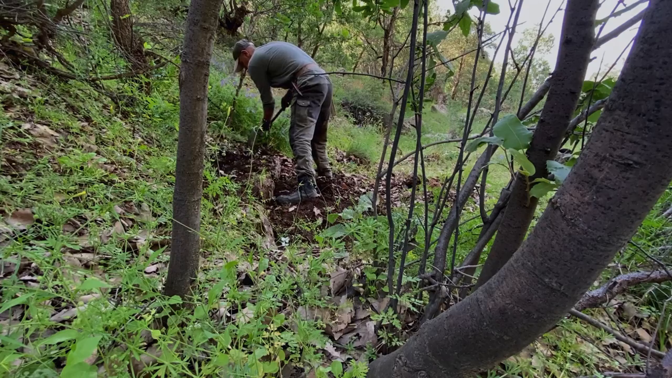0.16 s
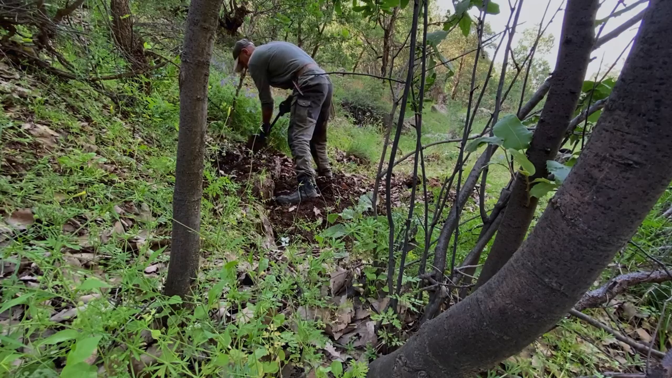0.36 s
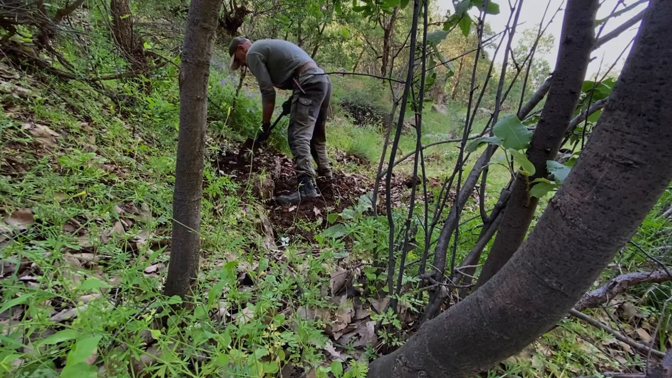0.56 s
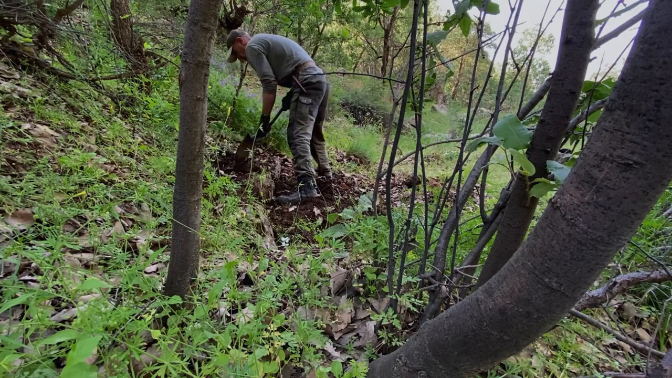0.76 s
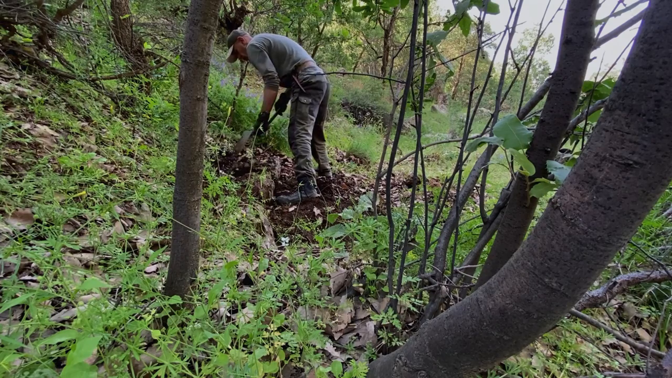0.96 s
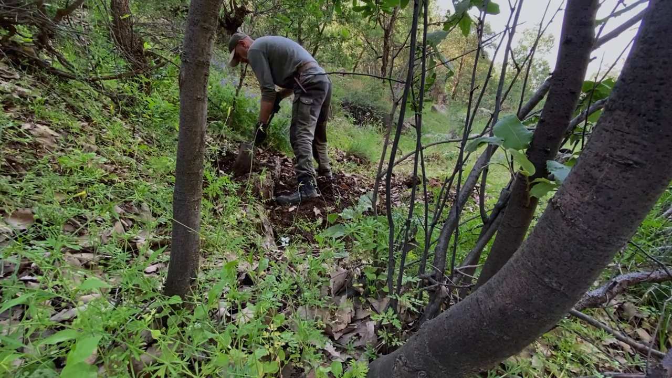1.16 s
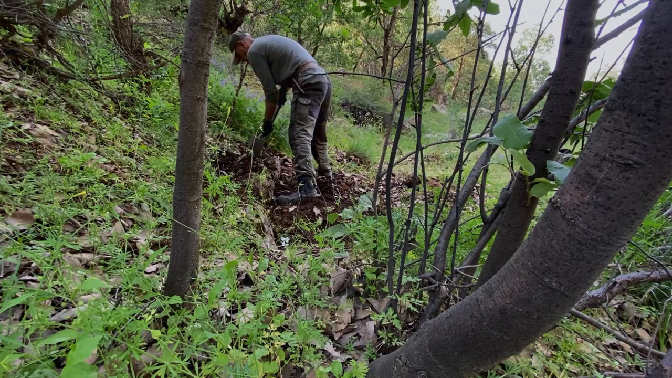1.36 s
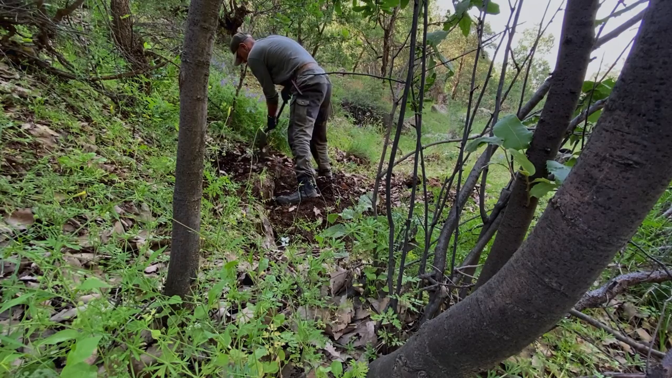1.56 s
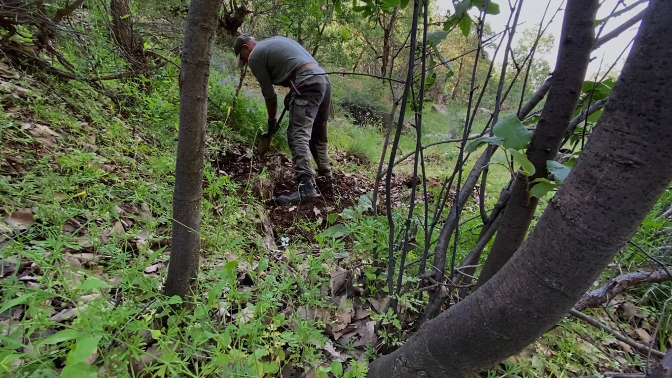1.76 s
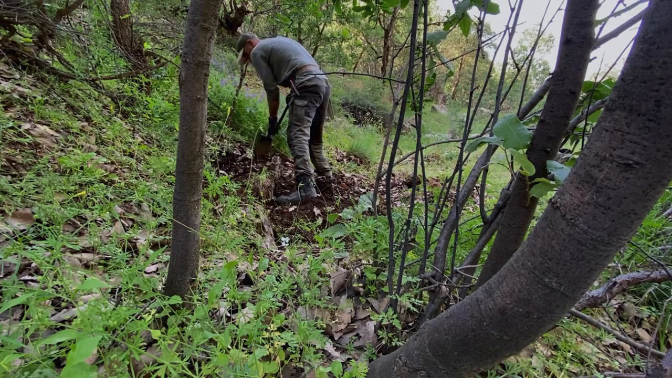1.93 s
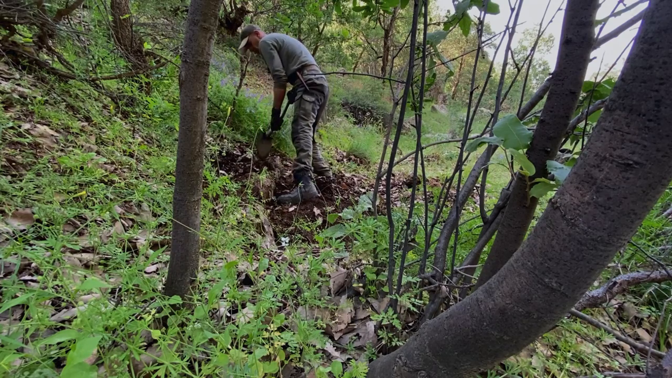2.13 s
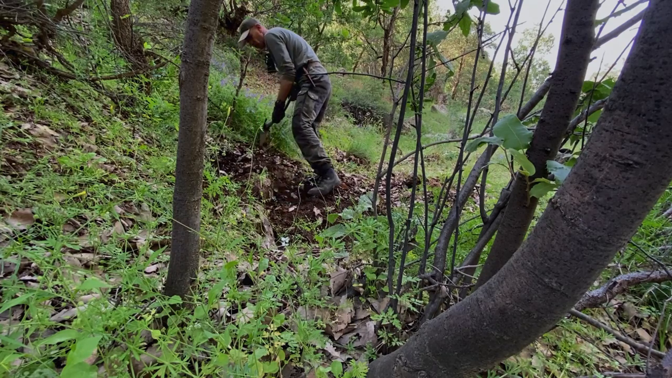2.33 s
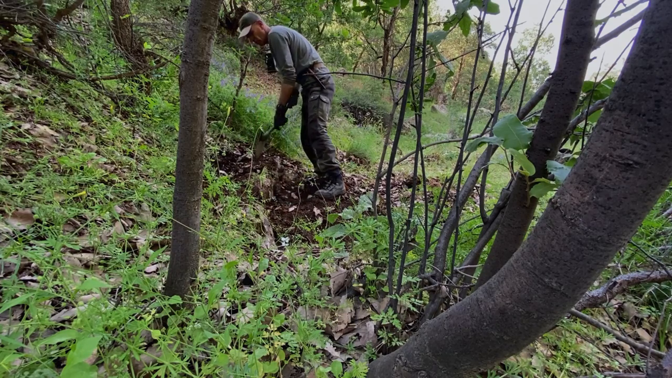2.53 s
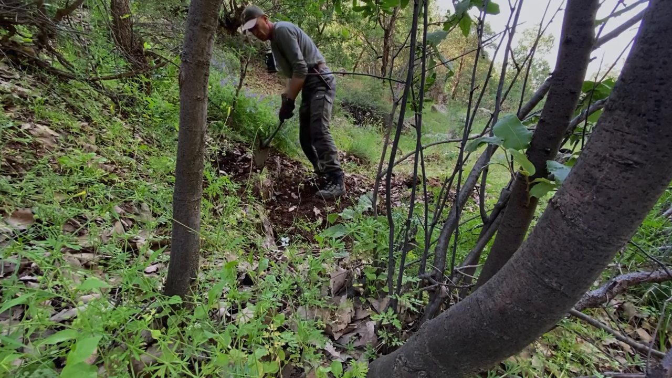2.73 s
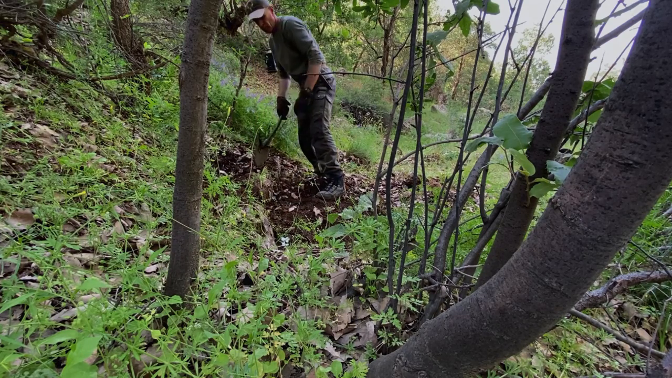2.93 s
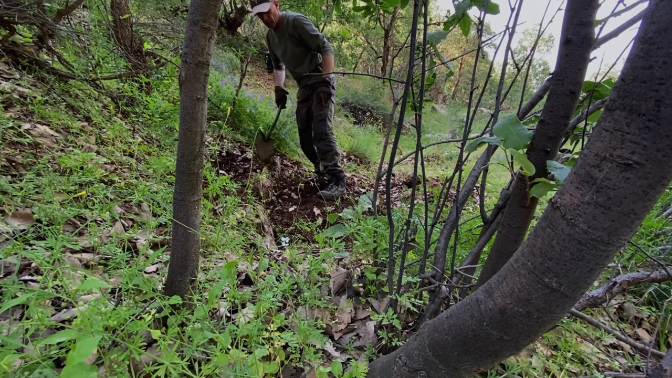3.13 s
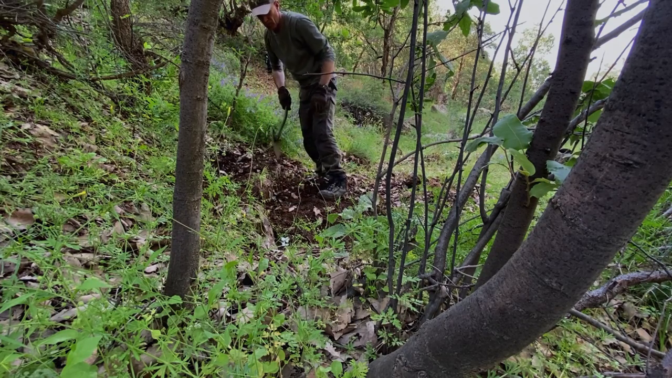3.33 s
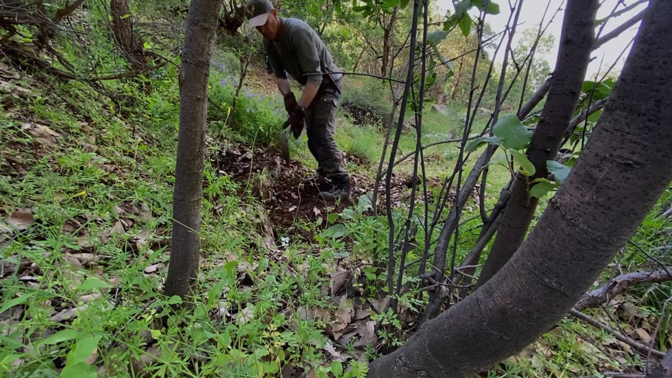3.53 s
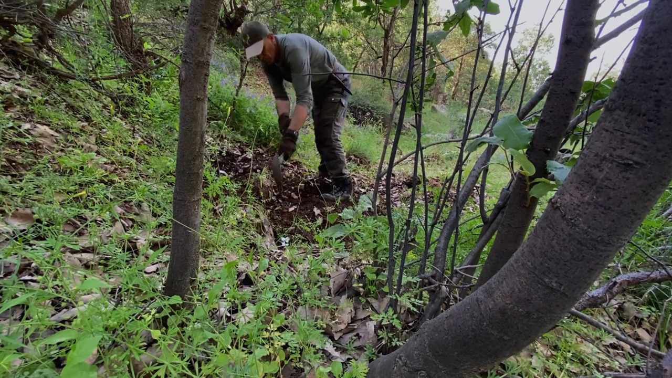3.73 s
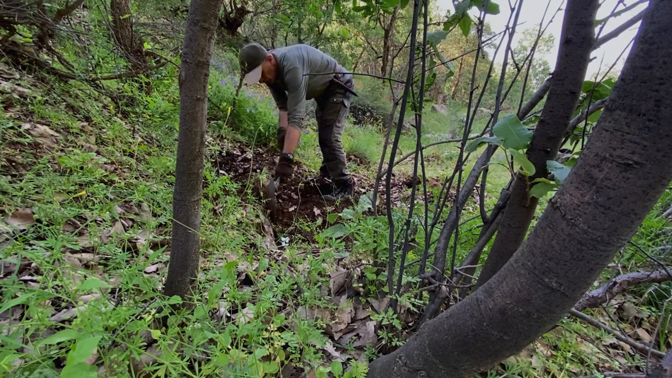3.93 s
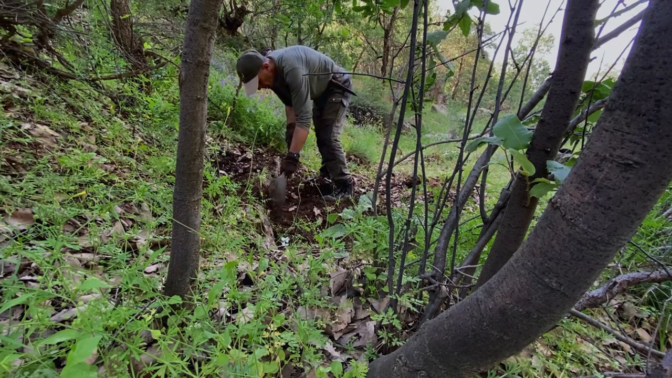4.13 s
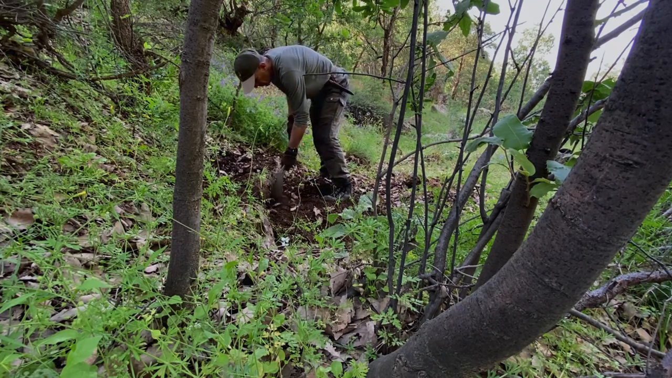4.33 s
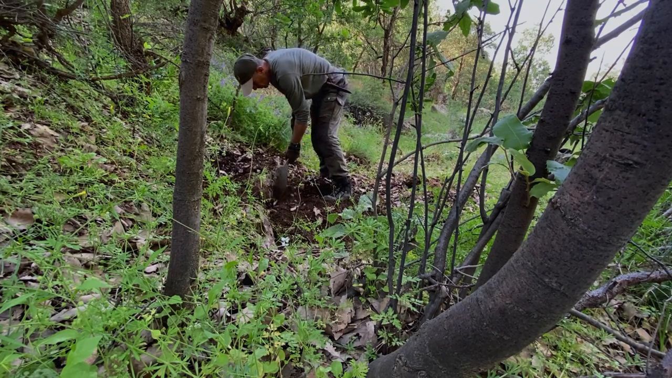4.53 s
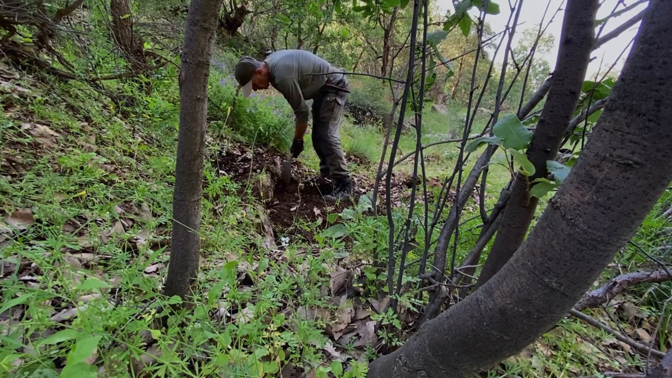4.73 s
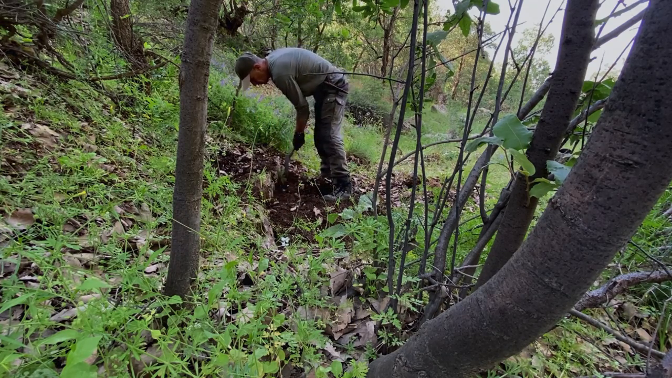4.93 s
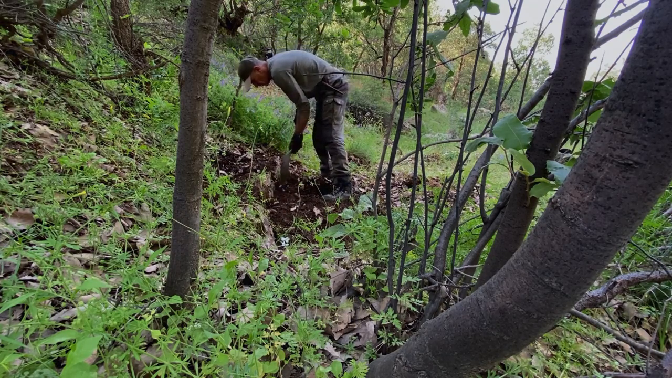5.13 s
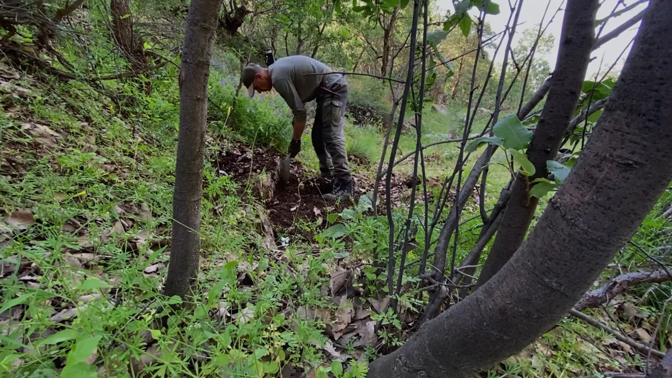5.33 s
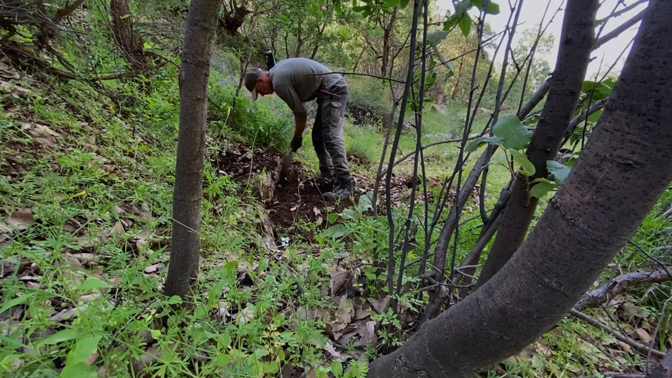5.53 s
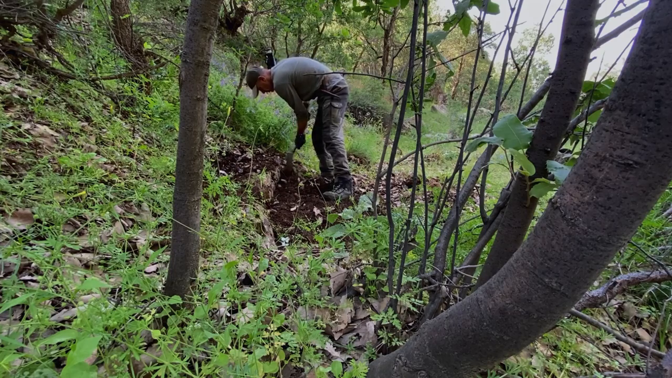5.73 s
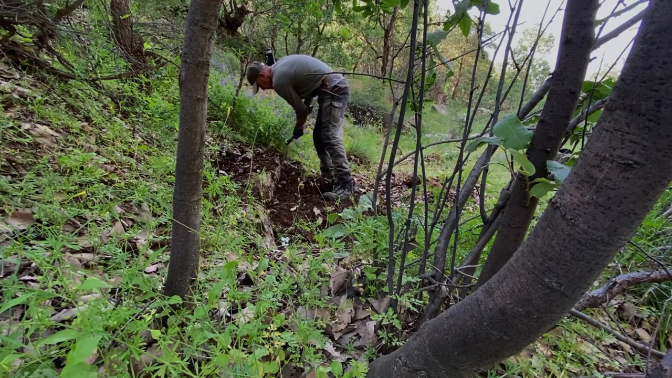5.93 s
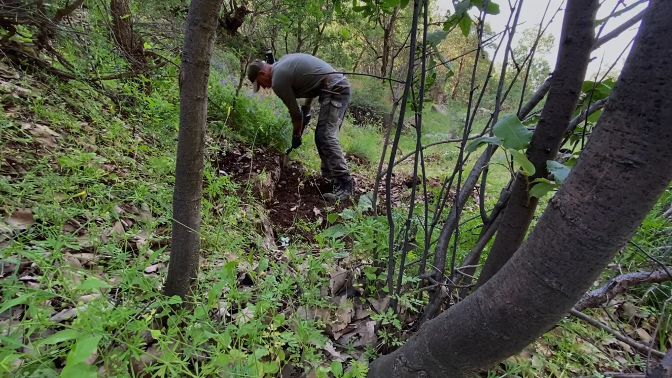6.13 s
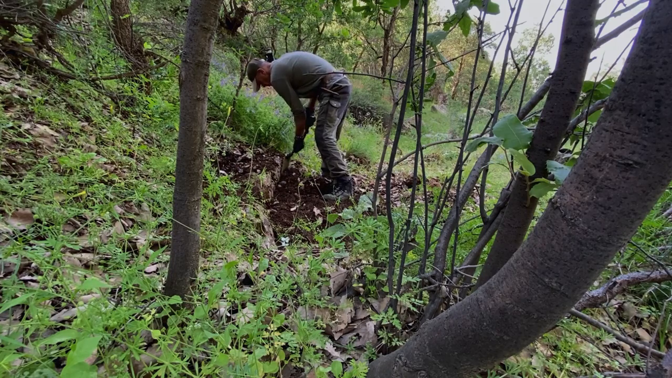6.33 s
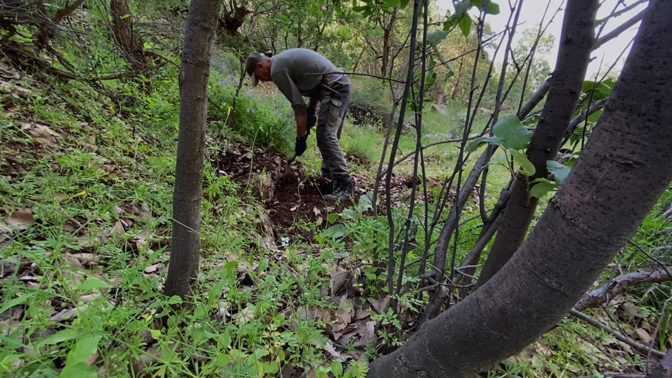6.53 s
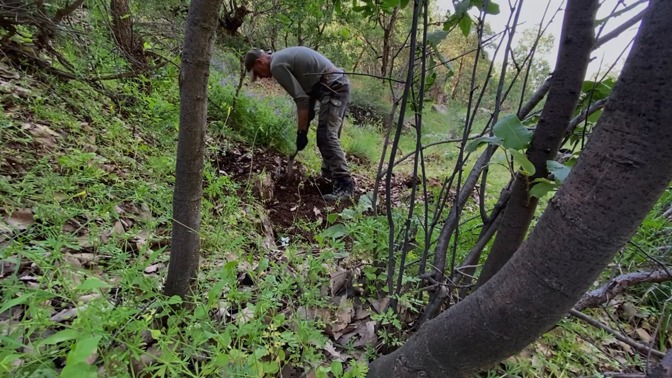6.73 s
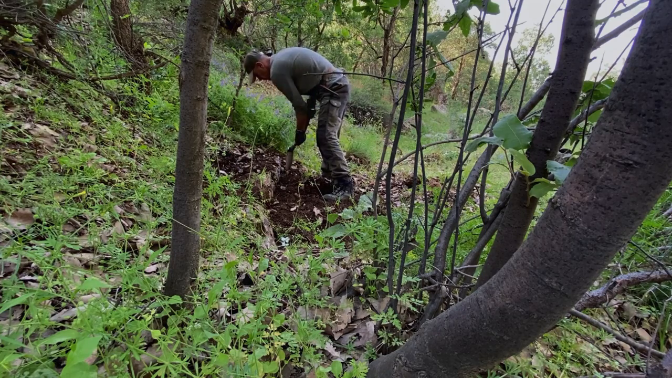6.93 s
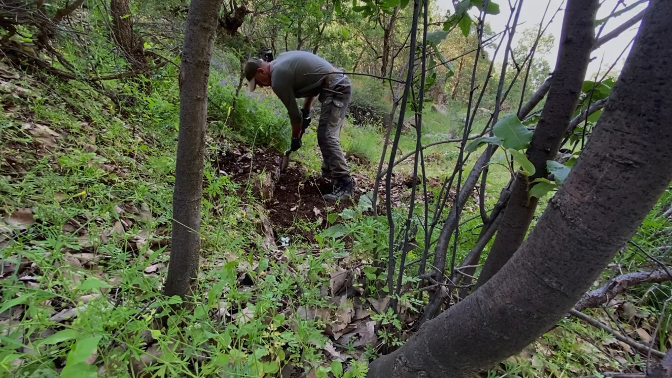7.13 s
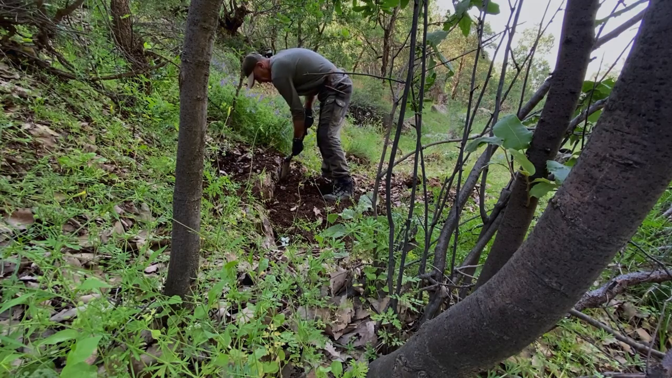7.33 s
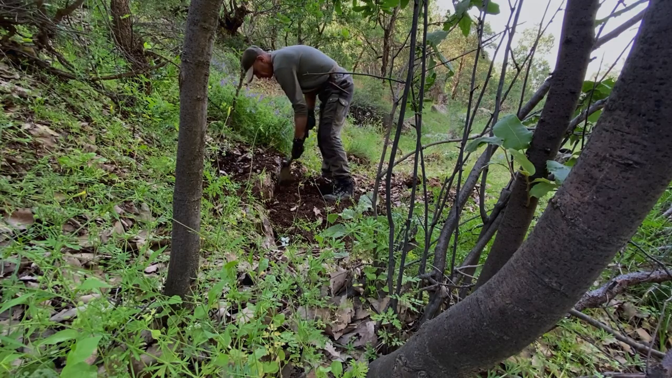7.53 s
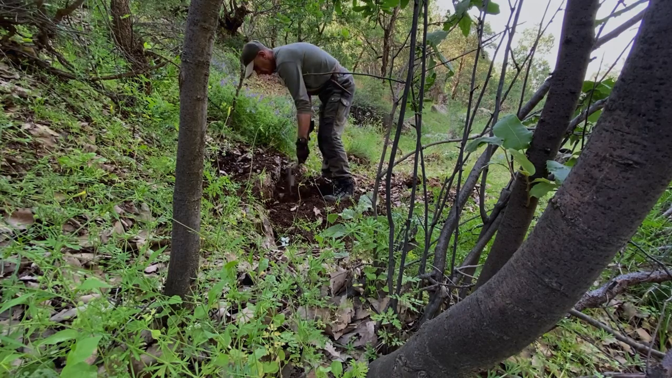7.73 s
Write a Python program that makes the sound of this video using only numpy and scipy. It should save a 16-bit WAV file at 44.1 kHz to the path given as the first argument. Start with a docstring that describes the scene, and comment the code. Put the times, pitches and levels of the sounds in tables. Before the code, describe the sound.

Light, crackly scraping through leaf litter and earth comes first, with a couple of knocks, then almost stops. About halfway through, four flurries of harder digging follow: a small tool clinks on stones, twigs crack, grit scatters and the ground thuds softly. The stereo microphone stands some metres off in a still wood, hearing the work a little left of centre with a slight echo from the trees.

```python
"""On a wooded slope, someone digs by hand with a small tool, some metres from two microphones.
The tool knocks on stones and roots and rings briefly. Dry leaves and twigs snap, grit ticks, and thuds
run through the ground. Thousands of tiny clicks make the rustle of leaves and crumbling soil.
Tree trunks scatter a little of it over the quiet of the wood, with one faint, far chirp."""
import sys
import numpy as np
from scipy import signal
from scipy.fft import rfft, irfft, next_fast_len
from scipy.io import wavfile
from scipy.ndimage import uniform_filter1d

SR = 44100
rng = np.random.default_rng(int(sys.argv[2]) if len(sys.argv) > 2 else 0)


def wav_record(signal):
    """Record a signal, one row per channel, as 16-bit PCM in the file named by sys.argv[1]."""
    frames = np.transpose(np.atleast_2d(signal))
    bounded = np.clip(frames, -1, 1)
    # unit amplitude maps onto the largest positive 16-bit level
    quanta = np.round(bounded * 32767).astype(np.int16)
    wavfile.write(sys.argv[1], SR, quanta)


N = 342657
HZ = np.fft.rfftfreq(next_fast_len(N), 1 / SR)


# The notes of tool and stones: pitch_hz, level_db, fade_s (a fade is the time to drop 60 dB)
TOOL_NOTES = [(385, -10, 0.011), (556, -2, 0.045), (860, -2.5, 0.13), (953, 1.5, 0.035), (1146, -3, 0.012),
              (1650, 3.5, 0.065), (1717, 2.5, .065), (2030, 1.5, .03), (2260, 4.5, 0.02), (2530, 3, 0.03),
              (2900, 5, 0.025), (3450, -18, 0.018)]
# Blows of the tool: start_s, level_db (before muffling), pitch_hz, ring_factor (low where soil grips)
KNOCKS = [(0.445, -45, 1200, .4), (0.579, -40, 1570, .3), (0.882, -37, 1570, .6), (0.983, -44, 826, .2),
          (1.222, -40, 900, .3), (1.236, -41, 1620, .4), (1.613, -24.5, 2070, .4), (1.666, -44, 401, .4),
          (1.884, -38, 1650, .4), (1.92, -39, 2020, .4), (2.076, -42, 2020, .4), (2.613, -52, 1640, .3),
          (2.65, -39, 1780, .3), (2.663, -17, 800, .2), (3.003, -43, 1100, .3), (3.043, -45, 1790, .3),
          (3.606, -55, 2200, .4), (3.633, -56, 1650, .3), (3.689, -47, 1100, .4), (3.953, -45, 1810, .3),
          (4.182, -12, 2110, .6), (4.186, -19, 900, .3), (4.219, -29, 1630, .3), (4.301, -25, 2270, .4),
          (4.329, -28, 2290, .4), (4.358, -7, 1000, .35), (4.379, -17, 748, .3), (4.382, -15, 1680, .9),
          (4.394, -17, 556, 1.1), (4.408, -21, 1650, 1.2), (4.42, -26, 556, .8), (4.463, -15, 1200, .3),
          (4.478, -24, 1650, .5), (4.511, -14, 1620, .4), (4.514, -20, 600, .4), (4.526, -22.5, 1610, .6),
          (4.645, -26, 2140, .4), (4.65, -28, 850, .35), (5.133, -45, 2270, .5), (5.28, -20, 900, .25),
          (5.284, -22, 2550, 1.2), (5.301, -25, 1460, .25), (5.371, -15, 1200, .5), (5.386, -20, 1600, .9),
          (5.427, -19, 670, .3), (5.476, -38, 2230, .5), (5.557, -31.5, 1580, .5), (5.636, -36, 760, .4),
          (5.67, -31, 2320, .5), (5.768, -39, 2310, .5), (6.104, -36, 1600, .4), (6.112, -38, 2050, 1.6),
          (6.168, -30, 934, .5), (6.246, -29, 2240, .6), (6.292, -25, 500, .4), (6.414, -21, 930, .9),
          (6.447, -23, 870, .6), (6.463, -11, 1050, .4), (6.467, -17, 2200, .6), (6.496, -30, 2080, .3),
          (6.728, -39, 2300, .3), (7.129, -41, 1730, .4), (7.19, -33.5, 2310, .6), (7.25, -25.5, 1730, .3),
          (7.263, -25.5, 934, .3), (7.273, -19, 1800, .4), (7.281, -24, 2030, .4), (7.291, -21, 2030, .4),
          (7.301, -20.5, 1100, .4), (7.317, -27, 905, .3), (7.335, -28.5, 2350, .5), (7.353, -36, 830, 1.2),
          (7.361, -32, 1770, .3), (7.393, -33, 476, .4), (7.479, -43, 830, 1.1), (7.534, -40, 830, 1.5),
          (7.595, -47, 830, 1.2)]

def knocks():
    """A blow and a short rattle ring the tool; notes near the blow's pitch ring loudest and longest."""
    out, t = np.zeros(N), np.arange(int(.2 * SR)) / SR
    for start_s, level_db, pitch_hz, ring_factor in KNOCKS:
        contact = rng.standard_normal(len(t)) * fade(t, fade_s=.021, rise_s=.0011)  # the rattle
        contact[int(.001 * SR)] += 3.5  # the blow
        ringing = 0
        for note_hz, note_db, fade_s in TOOL_NOTES:
            detune, luck = rng.standard_normal(2)
            octaves_away = abs(np.log2(note_hz / pitch_hz))
            gain = undb(note_db + 2.2 * luck - 11 * octaves_away)
            ring_s = max(ring_factor, .1) * fade_s / (1 + 1.6 * octaves_away)
            ringing += gain * ring(contact, note_hz * (1 + .022 * detune), ring_s)
        knock = peak_to_one(ringing) + .1 * contact  # packed earth answers without a pitch
        add(out, start_s, undb(level_db + 1.7) * peak_to_one(knock))
    muffle = 1 / (1 + 1j * HZ / 3500) ** 2  # soil around the blade dulls the highs
    thin = 1 / (1 - 1j * 380 / (HZ + 1)) ** 2  # the tool is too small to give off bass
    return shape(out, muffle * thin)


# The tone of dry leaves, of crumbling soil and of the ground's rumble: pitch_hz, level_db
LEAF_TONE = [(1200, -29), (2500, -9), (3500, -1.2), (5400, -1.5), (8000, 1), (10000, -5), (11200, -6),
             (12200, -13), (13300, -9.5), (15000, -11), (16000, -26)]
SOIL_TONE = [(150, -23), (350, 3), (700, 0), (1100, 1.5), (1650, 4), (2600, 3), (3600, -10), (6000, -22)]
GROUND_TONE = [(25, -35), (45, 6.5), (100, -7.5), (220, -1), (350, -4), (700, -21.5)]

def rustle(leaf_gain, soil_gain, ground_gain):
    """Leaves, pebbles and crumbs of soil make crowds of tiny clicks, and the ground rumbles below."""
    flurry = wander(30)
    leaves = leaf_gain * undb(1.2 * flurry) * colour(grains(2200, 1.7, 1.5, 90), LEAF_TONE)
    stones = leaf_gain * undb(-5) * pebbles()
    crumbs = grains(4000, 1.8, 2.2, 60)
    singing = undb(-12) * blade(leaves, pitch_hz=5500)
    soil = soil_gain * undb(3.05 * flurry) * colour(crumbs, SOIL_TONE)
    rumble = ground_gain * colour(grains(300, 1.0, 1.9, 7.7), GROUND_TONE)
    return leaves + singing + stones + soil + rumble


# Strokes through fallen leaves, which trickle on until the release:
# start_s, release_s, first_leaf_db, last_leaf_db, soil_db, ground_db
STROKES = [(0, 1.03, -58, -59, -68, -70), (1.225, 2.47, -58, -58, -67, -72),
           (2.66, 2.73, -58, -62, -65, -76), (3.2, 3.5, -74, -73, -83, -79),
           (3.95, 5.06, -62, -63, -69, -73), (5.28, 5.98, -54, -59, -65, -70),
           (6.095, 6.54, -62, -54, -68, -70), (7.03, 7.77, -65, -61, -72, -71)]
# Handfuls of leaf and soil pushed at once: loudest_s, leaf_db, soil_db, rise_s (to climb 20 dB), fade_s
SCRAPES = [(0.01, -49, -59, .02, .45), (0.28, -50, -59, .15, .7), (0.59, -45, -55, .15, .4),
           (1.23, -47, -52, .015, .2), (1.9, -46, -53, .1, .5), (2.16, -56, -67, .3, 1),
           (2.52, -58, -68, .1, .5), (2.66, -48, -52, .02, .3), (2.95, -78, -80, .4, .6),
           (3.05, -62, -61, .06, .15), (3.5, -78, -74, .1, .3), (3.62, -70, -70, .03, .3),
           (3.65, -69, -68, .07, .22), (3.8, -84, -74, .1, .4), (3.87, -64, -71, .03, .4),
           (3.96, -53, -65, .02, .17), (4.05, -50, -61, .08, .6), (4.14, -50, -62, .15, .5),
           (4.186, -34, -41, .03, .1), (4.22, -42, -50, .03, .2), (4.305, -40, -50, .05, .3),
           (4.375, -31, -44, .03, .2), (4.48, -43, -52, .06, .1), (4.52, -38, -48, .02, .17),
           (4.6, -53, -62, .2, .5), (4.65, -39, -58, .015, .2), (4.7, -50, -61, .05, .4),
           (4.85, -51, -57, .1, .25), (5.3, -45, -62, .008, .3), (5.39, -35, -51, .015, .06),
           (5.43, -40, -56, .02, .1), (5.56, -44, -51, .08, .25), (5.665, -54, -49, .1, .15),
           (6.12, -49, -59, .04, .12), (6.17, -47, -56, .04, .25), (6.25, -44, -64, .02, .13),
           (6.31, -51, -50, .04, .3), (6.345, -40, -46, .04, .12), (6.372, -38, -44, .05, .1),
           (6.445, -34, -41, .03, .15), (6.465, -32, -35, .02, .18), (6.495, -41, -46, .03, .15),
           (6.73, -63, -70, .02, .35), (7.18, -49, -59, .07, .3), (7.29, -43, -52, .05, .5),
           (7.36, -42, -48, .08, .2), (7.49, -53, -67, .04, .3), (7.54, -53, -66, .03, .3),
           (7.64, -53, -70, .04, .3), (7.7, -53, -63, .04, .5)]

def digging():
    """How loud leaf, soil and ground are: strokes start sharply, hold and die; scrapes swell on top."""
    attack_s, release_db_per_s = .02, 120
    t = np.arange(N) / SR
    power = np.zeros((3, N))
    power[2] = undb(-84) ** 2  # the ground is never quite still
    for start_s, release_s, first_db, last_db, soil_db, ground_db in STROKES:
        attack = np.clip((t - start_s) / attack_s, 0, 1)
        release = undb(-release_db_per_s * np.maximum(t - release_s, 0))
        drift_db = np.interp(t, [start_s, release_s], [-.5, .5]) * (last_db - first_db)
        gains = undb([[(first_db + last_db) / 2], [soil_db], [ground_db]])
        power += (attack * release * undb(drift_db) * gains) ** 2
    for loudest_s, leaf_db, soil_db, rise_s, fade_s in SCRAPES:
        age_s = t - loudest_s
        swell = undb(np.where(age_s < 0, 20 * age_s / rise_s, -60 * age_s / fade_s))
        power += (swell * undb([[leaf_db], [soil_db], [soil_db - 16]])) ** 2
    return np.sqrt(power)


# Leaves and twigs breaking: start_s, level_db (before muffling), pitch_hz
SNAPS = [(0.1648, -39, 7000), (0.46, -44, 4570), (0.5776, -45, 6960), (0.6539, -44, 5360),
         (0.881, -38, 8430), (0.9872, -47, 5430), (1.4721, -52, 5430), (1.6185, -46, 5990),
         (1.8831, -44, 9230), (2.4105, -47, 9900), (2.633, -50, 8000), (2.648, -33, 8500),
         (2.659, -27, 6300), (3.044, -51, 5730), (3.4017, -60, 9780), (3.644, -58, 10000),
         (3.8681, -53, 10000), (3.953, -56, 5060), (4.1784, -21, 8800), (4.3018, -30, 7710),
         (4.3585, -18, 10300), (4.378, -38, 5850), (4.463, -19.5, 10500), (4.5106, -27, 5300),
         (4.6465, -21, 9880), (4.65, -31, 4800), (4.805, -39.5, 10300), (5.2775, -30, 5470),
         (5.3022, -35, 5080), (5.371, -32, 6840), (5.4255, -30, 5120), (5.5385, -35, 10400),
         (5.8272, -44.5, 6360), (6.105, -46, 5310), (6.163, -39, 4770), (6.2437, -38.5, 4450),
         (6.2926, -37, 5540), (6.338, -40, 5950), (6.4357, -35, 4100), (6.4485, -27, 4300),
         (6.4618, -25, 6690), (6.7294, -55, 4960), (7.034, -52, 4550), (7.148, -47, 10200),
         (7.174, -41.5, 6070), (7.2734, -33, 6700), (7.2988, -40, 6750), (7.478, -41.5, 5620),
         (7.5143, -44.5, 4640), (7.6297, -40, 4760), (7.7, -40, 5380), (7.7448, -42, 6750)]

def snaps():
    """Bits of leaf and grit crack and scatter over the blade."""
    out, t = np.zeros(N), np.arange(int(.3 * SR)) / SR
    bits = colour(grains(8300, 1.3, 1.9, 300), LEAF_TONE)
    # a sharp edge, a short body and a faint tail
    outline = undb(-1) * fade(t, .008, .0004) + undb(2.5) * fade(t, .034, .003)
    outline += undb(-22.5) * fade(t, .136, .003)
    for start_s, level_db, pitch_hz in SNAPS:
        brightness = np.clip(.3 * np.log2(pitch_hz / 6000), -.6, .7)  # small dry bits crack brighter
        crackle = signal.lfilter([1, -brightness], [1], piece(bits, start_s, len(t)))
        crack = undb(level_db) * outline * crackle
        add(out, start_s, crack + undb(1.3) * blade(crack, pitch_hz))
    return shape(out, 1 / (1 + 1j * HZ / 12000) ** 2)  # the soil swallows the very top


# Bare ticks of twig and grit: start_s, level_db, pitch_hz
TICKS = [(0.1645, -37, 7530), (0.4434, -39, 5610), (0.8594, -39, 9730), (0.8819, -35, 8430),
         (1.2236, -38, 6800), (2.4114, -42, 9900), (2.4818, -45, 8580), (2.5072, -42, 11100),
         (2.5224, -44, 6100), (3.0244, -46, 3410), (3.2071, -57, 5260), (3.2266, -63, 10100),
         (3.24, -56, 9580), (3.2819, -62, 9760), (3.3238, -56, 10300), (3.3374, -55, 9570),
         (3.4017, -50, 9790), (3.4294, -58, 5780), (3.5019, -47, 10200), (3.6047, -56, 4030),
         (3.6301, -53, 3400), (3.6431, -53, 10000), (3.6885, -51, 2500), (3.8681, -46, 9990),
         (3.8774, -57, 4980), (4.4628, -20, 10400), (4.7486, -44, 10300), (5.3717, -24, 2590),
         (5.4266, -27, 5120), (5.4745, -39, 5070), (5.5393, -31, 10400), (5.7119, -44, 6010),
         (5.7663, -41, 8380), (5.8272, -40, 6380), (6.099, -37, 2600), (6.4627, -17, 3760),
         (6.5794, -44, 4750), (7.1492, -40, 10100), (7.2904, -28, 6710), (7.5143, -38, 4600),
         (7.5314, -38, 5700)]

def ticks():
    """Each tick is a very short click, strongest near its own pitch, with a faint scatter behind it."""
    out, t = np.zeros(N), np.arange(int(.05 * SR)) / SR
    outline = fade(t, .005, .0002) + undb(-18) * fade(t, .03, .001)
    for start_s, level_db, pitch_hz in TICKS:
        burst = rng.standard_normal(len(t)) * outline
        click = np.diff(burst, prepend=0) + 3 * ring(burst, pitch_hz, fade_s=.003)
        add(out, start_s, undb(level_db + 1.2) * peak_to_one(click))
    return out


# Thuds in the ground: start_s, level_db, fade_s (each part of a thud takes its own multiple)
THUDS = [(0.01, -54, 0.3), (0.446, -51, 0.21), (1.225, -49.5, 0.21), (1.613, -46, 0.2), (1.663, -50, 0.25),
         (1.894, -35, 0.1), (2.329, -54.5, 0.2), (2.663, -33, 0.12), (3.03, -58, 0.3), (4.182, -48, 0.45),
         (4.356, -45, 0.16), (4.384, -41, 0.22), (4.464, -23, 0.08), (4.514, -48, 0.12),
         (5.154, -43, 0.087), (5.278, -48, 0.15), (5.304, -47, 0.35), (5.374, -47, 0.2), (5.429, -45, 0.2),
         (5.679, -47.5, 0.079), (5.711, -44, 0.11), (5.857, -45.5, 0.05), (6.096, -49, 0.35),
         (6.293, -40, 0.15), (6.359, -39.5, 0.17), (6.414, -47, 0.16), (6.463, -45, 0.32),
         (6.499, -55, 0.17), (7.152, -50.5, 0.15), (7.252, -47, 0.16), (7.307, -46, 0.19),
         (7.339, -45, 0.11), (7.391, -36, 0.064)]

def thuds():
    """Soil carries low notes more slowly, so each thud slides down unevenly; loose clods rumble along."""
    out, t = np.zeros(N), np.arange(int(.3 * SR)) / SR
    wobble = 1.7 * wander(100)
    clods = colour(grains(500, 2.0, 2.0, 40), GROUND_TONE)
    for start_s, level_db, fade_s in THUDS:
        pitch_hz = 52 + 2.1 * (1 + .16 * rng.standard_normal()) / (t + .003)
        phase = 2 * np.pi * np.cumsum(pitch_hz) / SR + piece(wobble, start_s, len(t))
        boom = np.sin(phase) * (fade(t, .35 * fade_s, .0033) + undb(-4) * fade(t, 1.2 * fade_s, .012))
        rumble = undb(-2) * piece(clods, start_s, len(t)) * fade(t, .6 * fade_s, .004)
        add(out, start_s - .001, undb(level_db - 1) * (boom + rumble))
    return out


# The high notes of the thin blade: pitch_hz, level_db, fade_s
BLADE_NOTES = [(4010, -7, 0.02), (4750, -4, 0.025), (5150, -4, .045), (5400, -3, 0.02), (5800, -6, 0.02),
               (6834, -7, 0.035), (7580, -6, .02), (10300, -8, .025)]

def blade(grit, pitch_hz):
    """Grit rings the blade, most near the given pitch; grip and soil shift the notes a bit each time."""
    out = 0
    for note_hz, level_db, fade_s in BLADE_NOTES:
        octaves_away = abs(np.log2(note_hz / pitch_hz))
        shifted_hz = note_hz * (1 + .015 * rng.standard_normal())
        out += undb(level_db - 22 * octaves_away) * ring(grit, shifted_hz, fade_s)
    return out


def pebbles():
    """Small stones clink against each other, each size at its own pitch."""
    pitches_hz = np.geomspace(3200, 11500, 20)
    clinks = sum(ring(grains(25, 1.0, 2.5, 40), hz, fade_s=.03) for hz in pitches_hz)
    return clinks / np.sqrt(np.mean(clinks ** 2))


def trunks(sound):
    """Tree trunks send back a short blur of echoes, different on the left and right."""
    t = np.arange(int(.3 * SR)) / SR
    echoes = rng.standard_normal((2, len(t))) * fade(t, fade_s=.15, rise_s=.0014)
    echoes /= np.sqrt(np.sum(echoes ** 2, axis=1, keepdims=True))
    brighten = np.clip(HZ / 2500, .6, 1.4)
    return shape(sound, rfft(echoes, next_fast_len(N)) * brighten)


# The tone of the wood's hush: pitch_hz, level_db
HUSH_TONE = [(18, -37.5), (30, -10.5), (112, -3), (161, -20), (245, -15.5), (303, -19), (844, -29.5),
             (4780, -31.5), (11100, -50.5), (12600, -39), (16000, -43)]

def quiet_wood():
    """A soft, wavering hush: left and right are alike in the lows and unlike in the highs."""
    shared, apart = rng.standard_normal((2, N))
    apart = shape(apart, np.clip(HZ / 1500, .2, 1))
    hush = colour(np.array([shared + apart, shared - apart]), HUSH_TONE)
    return undb(-73.5) * hush * undb(1.8 * wander(18))


def chirp(start_s=6.97, length_s=.07, pitch_hz=4500):
    """One faint, slightly rough chirp from the trees, perhaps a bird."""
    out, t = np.zeros(N), np.arange(int(length_s * SR)) / SR
    voice = ring(rng.standard_normal(len(t)), pitch_hz, fade_s=.015)
    add(out, start_s, undb(-73) * np.sin(np.pi * t / length_s) * voice / np.std(voice))
    return out


# How far the left microphone leads the right: pitch_hz, lead_radians
LEFT_LEAD = [(0, 0), (1290, 1.7), (1980, 1.4), (5170, 4.4), (7670, 10.6), (8270, 9.5), (8960, 7.1),
             (10500, 6.0), (11500, 3.3), (12700, 3.0), (13200, 0.2), (14600, -0.1), (15200, -3.0),
             (16000, -3.2)]
# How much louder the left one is: pitch_hz, level_db
LEFT_BOOST = [(60, 2.0), (110, 2.0), (200, 1.5), (380, 2.0), (700, 3.5), (1290, 4.0), (2380, 0.5),
              (4400, 4.0), (8120, 0.5), (15000, 0.0)]

def from_the_left(sound):
    """At most pitches the digging reaches the left microphone first and louder."""
    lead_radians = np.interp(HZ, *np.transpose(LEFT_LEAD))
    left = undb(curve(LEFT_BOOST) / 2) * np.exp(.5j * lead_radians)
    return shape(sound, np.array([left, 1 / left]))


def undb(db):
    """Turn decibels into a gain to multiply by."""
    return 10 ** (np.asarray(db) / 20)


def peak_to_one(sound):
    """Scale a sound so its biggest swing is 1."""
    return sound / np.max(np.abs(sound))


def curve(table):
    """Join a table's points to get a value at every pitch."""
    hz, value = np.transpose(table)
    return np.interp(np.log(HZ + 1), np.log(hz + 1), value)


def shape(sound, response):
    """Filter a sound, with one gain for each pitch."""
    return irfft(rfft(sound, next_fast_len(N)) * response, next_fast_len(N))[..., :N]


def colour(sound, tone):
    """Give a sound the table's tone and an average (rms) level of 1."""
    cepstrum = irfft(curve(tone) * np.log(10) / 20)
    cepstrum[1:len(cepstrum) // 2] *= 2  # folded so that nothing sounds before its click
    cepstrum[len(cepstrum) // 2:] = 0
    toned = shape(sound, np.exp(rfft(cepstrum)))
    return toned / np.sqrt(np.mean(toned ** 2))


def wander(steps_per_s):
    """Glide between random values, mostly within -1 to 1."""
    step = max(int(SR / steps_per_s), 2)
    return uniform_filter1d(np.repeat(rng.standard_normal(N // step + 1), step), step)[:N]


def grains(clicks_per_s, spread_db, flicker_db, flickers_per_s):
    """Clicks at random moments, few large and many small, in uneven flurries."""
    out = np.zeros(N)
    hits = np.flatnonzero(rng.random(N) < clicks_per_s / SR)
    level_db = spread_db * rng.exponential(size=len(hits)) + flicker_db * wander(flickers_per_s)[hits]
    out[hits] = undb(level_db) * rng.standard_normal(len(hits))
    return out


def piece(sound, start_s, samples):
    """Take part of a sound, wrapping round at its end."""
    return np.roll(sound, -int(start_s * SR))[:samples]


def add(out, start_s, sound):
    """Mix a sound in at the given time."""
    i = max(int(start_s * SR), 0)
    out[i:i + len(sound)] += sound[:N - i]


def fade(t, fade_s, rise_s):
    """Rise smoothly and die away, 60 dB every fade_s."""
    rise = np.sin(np.pi / 2 * np.clip(t / max(rise_s, .0002), 0, 1)) ** 2
    return rise * undb(-60 * t / max(fade_s, .004))


def ring(sound, pitch_hz, fade_s):
    """Let a sound set one note ringing."""
    decay, angle = np.exp(-np.log(1000) / (fade_s * SR)), 2 * np.pi * pitch_hz / SR
    gain = np.sqrt(1 - decay) * decay * np.sin(angle)
    return signal.lfilter([0, gain], [1, -2 * decay * np.cos(angle), decay * decay], sound)


def scene():
    """Digging to the left, more rustling straight ahead, and the wood all around."""
    gains = digging()
    dig = rustle(*gains) + knocks() + snaps() + ticks() + thuds()
    echoes = undb(-11) * trunks(dig)
    ahead = undb(-7) * rustle(*gains)
    return from_the_left(dig) + ahead + echoes + quiet_wood() + chirp()


def record(dry):
    """The camera cuts the deepest bass and the highest treble."""
    bass_cut = signal.butter(4, 42, "high", fs=SR, output="sos")
    treble_cut = signal.ellip(10, .2, 80, 16200, fs=SR, output="sos")
    return signal.sosfilt(treble_cut, signal.sosfilt(bass_cut, dry))


dry = scene()
out = record(dry)
wav_record(out)
```